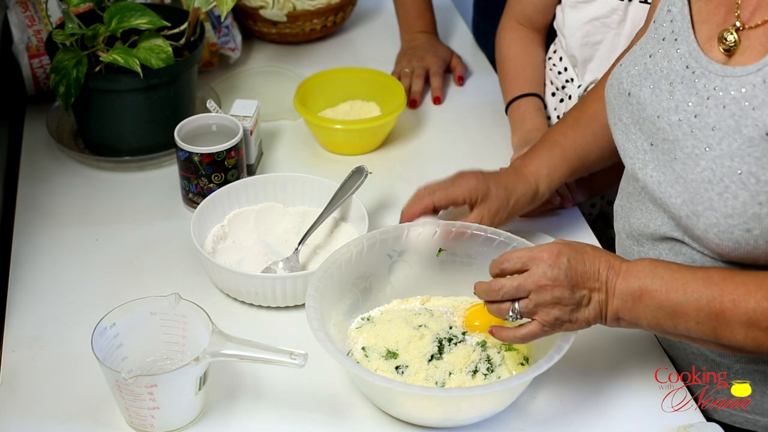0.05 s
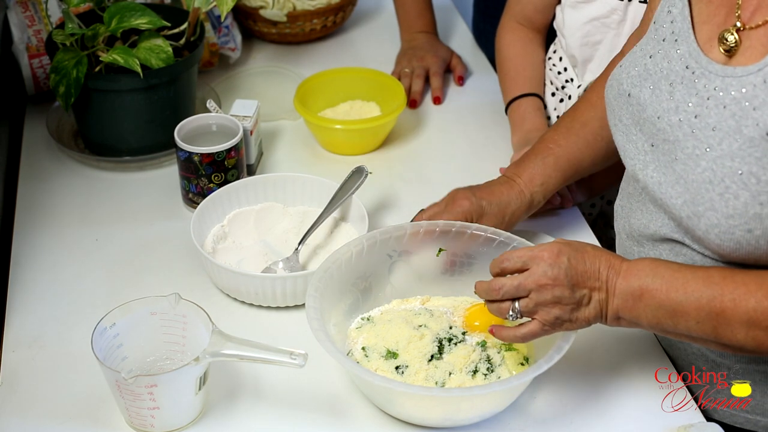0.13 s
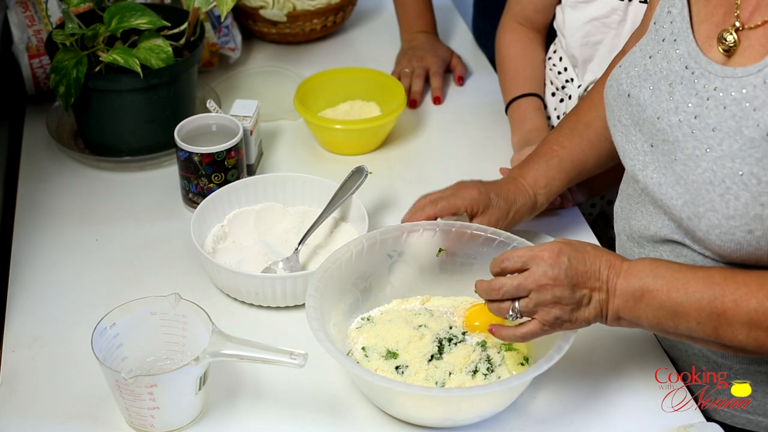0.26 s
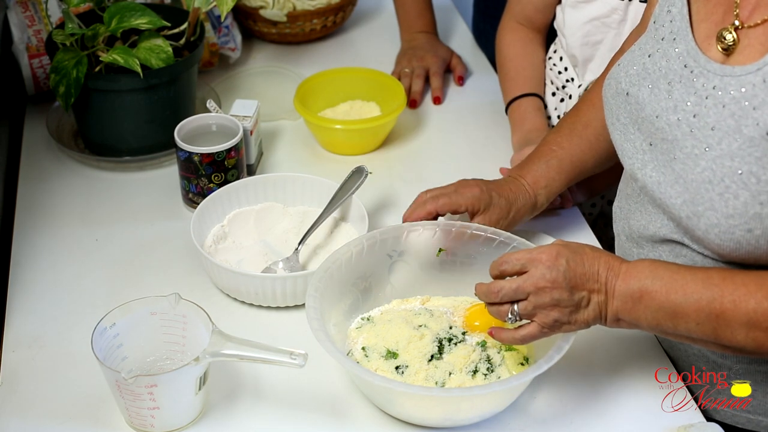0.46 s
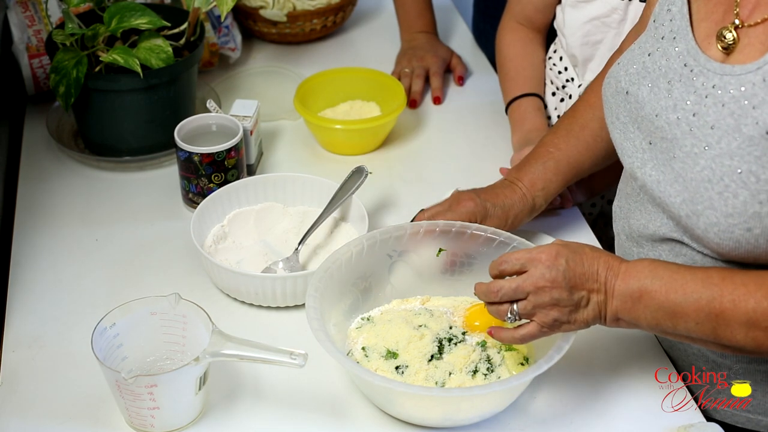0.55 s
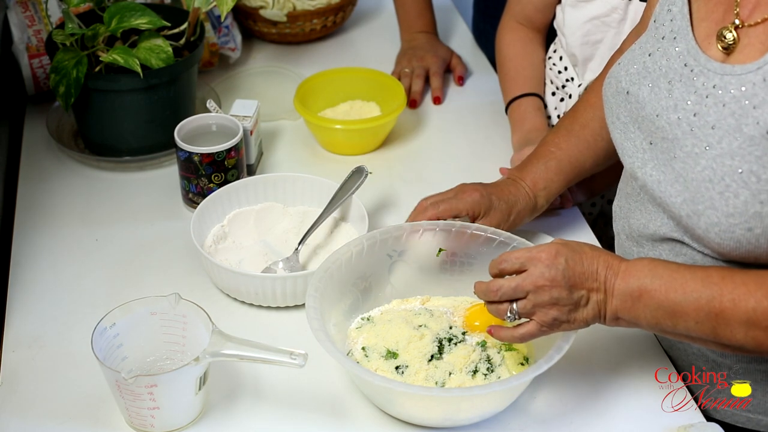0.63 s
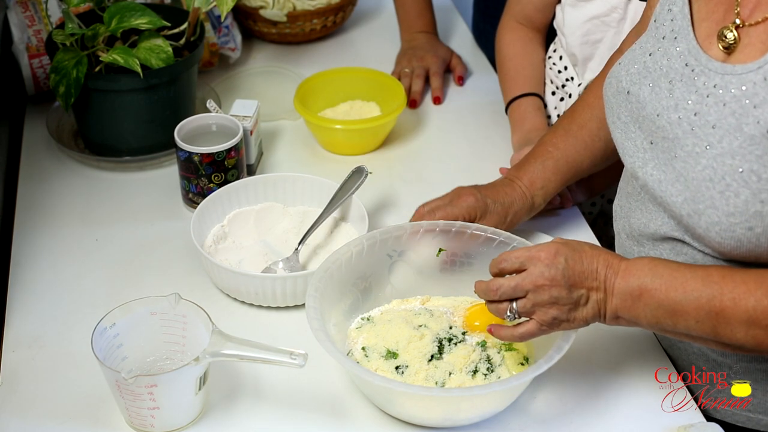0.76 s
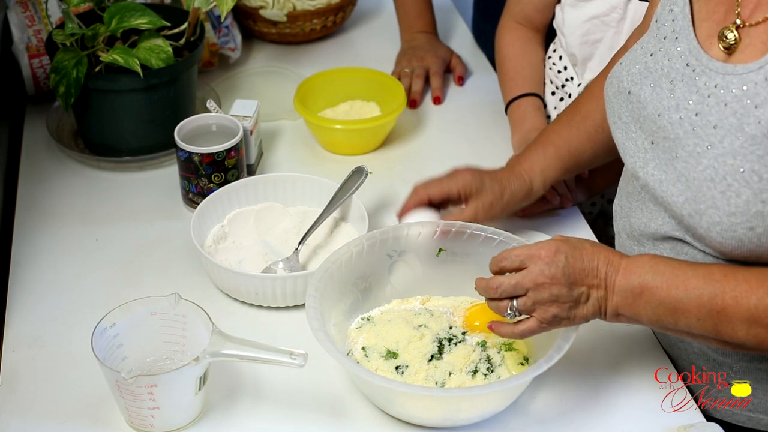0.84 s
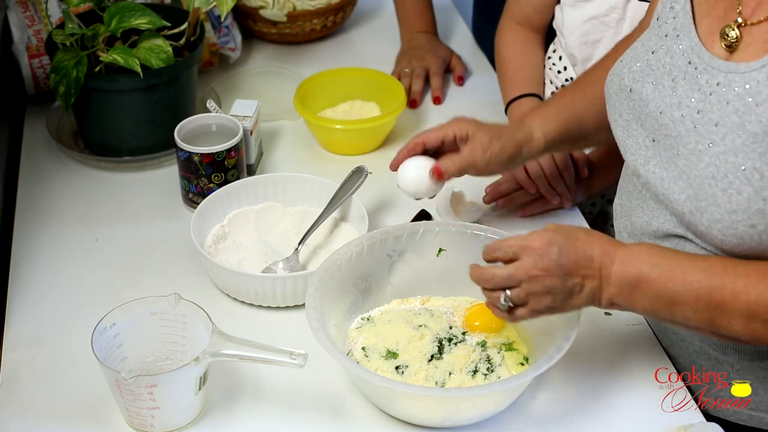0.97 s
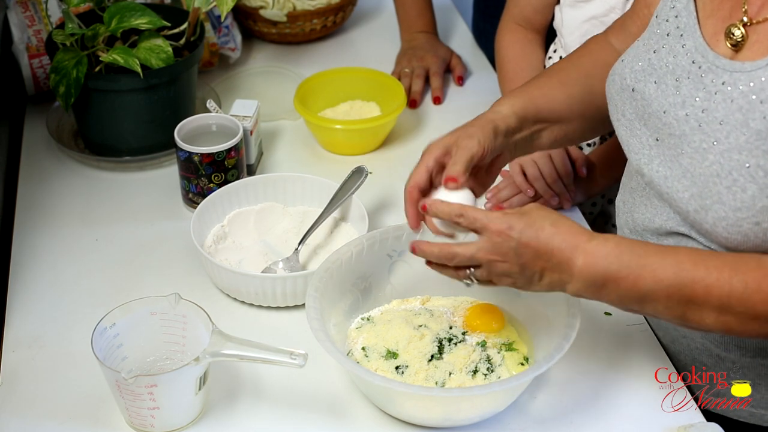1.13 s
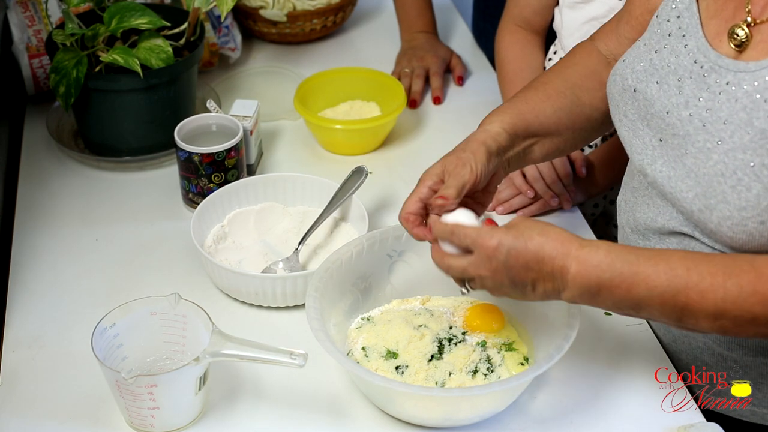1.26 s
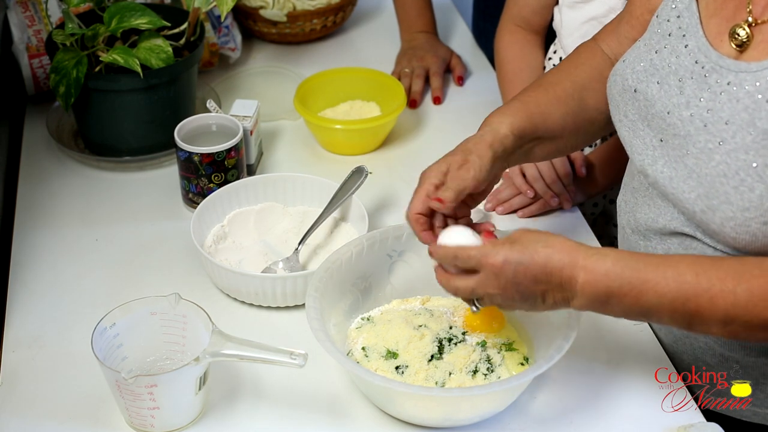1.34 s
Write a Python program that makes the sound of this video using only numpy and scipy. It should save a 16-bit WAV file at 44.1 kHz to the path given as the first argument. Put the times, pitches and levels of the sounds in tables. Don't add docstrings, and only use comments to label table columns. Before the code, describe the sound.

An egg is knocked four times on a hard edge, each softer, then its shell ticks

```python
import sys
import numpy as np
from scipy import signal
from scipy.io import wavfile

SR = 44100
rng = np.random.default_rng(int(sys.argv[2]) if len(sys.argv) > 2 else 0)


def volts_from_decibels(level):
    exponent = np.asarray(level, float) / 20
    return 10 ** exponent


def int16_out(signal):
    q = np.round(np.clip(np.atleast_2d(signal).T, -1, 1) * 32767)
    wavfile.write(sys.argv[1], SR, q.astype(np.int16))


N = 61739


def rms_one(x):
    return x / np.sqrt(np.mean(x ** 2) + 1e-20)


def at_hz(points, hz):
    table_hz, value = np.transpose(points)
    return np.interp(np.log(hz), np.log(table_hz), value)


def ring(x, hz, t60):
    r = volts_from_decibels(-60 / (t60 * SR))
    w = 2 * np.pi * hz / SR
    return signal.lfilter([0, np.sin(w)], [1, -2 * r * np.cos(w), r * r], x + 1e-18)


def bandpass(x, low_hz, high_hz):
    return signal.sosfilt(signal.butter(2, [low_hz, high_hz], "band", fs=SR, output="sos"), x)


def lowpass(x, hz, order=2):
    return signal.sosfilt(signal.butter(order, hz, fs=SR, output="sos"), x)


def bands(pair, low_hz):
    edges = low_hz * 2 ** np.arange(0, 12, 0.5)
    edges = edges[edges < 0.45 * SR]
    return [(np.sqrt(a * b), bandpass(pair[k % 2], a, b)) for k, (a, b) in enumerate(zip(edges, edges[1:]))]


def coloured(x, spectrum):
    lowest, highest = spectrum[0][0] / 1.2, spectrum[-1][0] * 1.5 / 1.2
    return sum(volts_from_decibels(at_hz(spectrum, hz)) * band
               for hz, band in bands([x, -x], 140) if lowest < hz < highest)


def click_at(s, gain):
    x = np.zeros(N)
    x[int(s * SR)] = gain
    return x


# frequency in Hz, level in dB per Hz
HUSH_COLOUR = [(20, 4.5), (117, -3.5), (265, 2.5), (500, -11.5), (1020, -16.5), (2500, -33.5),
               (6000, -35.5), (16500, -36.5)]
# frequency in Hz, width in Hz, level in dB
HUM_PARTIALS = [(178, 12, -86.5), (258, 14, -75), (315.3, 23, -67.5), (338.7, 12, -88), (463, 8, -69.5),
                (477.7, 10, -74), (790, 9.2, -96), (15400, 40, -99)]


def kitchen():
    white = rng.standard_normal((2, N + SR))
    hush = sum(volts_from_decibels(at_hz(HUSH_COLOUR, hz)) * band for hz, band in bands(white, 25))[SR:]
    out = volts_from_decibels(-59.5) * rms_one(hush)
    for hz, width_hz, db in HUM_PARTIALS:
        partial = ring(rng.standard_normal(N + SR), hz, 4.9 / width_hz)[SR:]
        out += volts_from_decibels(db) * rms_one(partial)
    return out


# start in seconds, level in dB, pitch in Hz, ring in cycles
SHELL_TICKS = [(0.027, -63.5, 3850, 19), (0.0278, -63.5, 1900, 6.5), (0.2075, -64, 8100, 20),
               (0.38, -62, 13300, 8), (0.798, -67, 2700, 12), (0.993, -55.5, 11240, 2.9),
               (1.025, -69.5, 13500, 8), (1.0358, -54.5, 8040, 8.3), (1.0346, -56.5, 11490, 6.5),
               (1.0355, -72.5, 5300, 8), (1.039, -51, 9430, 13.8), (1.045, -54, 8230, 18),
               (1.047, -67, 5700, 19), (1.086, -59, 11170, 2.9), (1.186, -60, 4600, 9.8),
               (1.1862, -61, 10400, 4), (1.232, -65, 8030, 11.3), (1.241, -54.5, 1700, 3.4),
               (1.2406, -56.5, 2920, 4.3), (1.2398, -56.5, 6360, 10.6), (1.2413, -55, 9600, 6.2),
               (1.257, -61, 2540, 4), (1.269, -80, 2600, 6.6), (1.260, -63, 9100, 2.9),
               (1.277, -64.5, 2540, 2.7), (1.3194, -57.5, 3140, 9.7), (1.3182, -58.5, 10400, 7),
               (1.3192, -57, 6800, 12), (1.327, -48, 7350, 4)]


def ticks():
    spread_s = 0.00012
    out, t = np.zeros(N + SR), np.arange(SR // 20) / SR
    for s, db, hz, cycles in SHELL_TICKS:
        rag = rng.standard_normal(len(t)) * np.exp(-t / spread_s)
        t60 = cycles / hz
        snap = ring(ring(rag, hz, t60), hz, t60)
        start = int(s * SR)
        out[start:start + len(t)] += volts_from_decibels(db + 3.5) * snap / np.abs(snap).max()
    return out[:N]


# frequency in Hz, t60 in seconds
ROOM_DECAY = [(200, .22), (500, .22), (1400, 0.21), (3000, .21), (7500, 0.17), (12000, 0.17), (16000, 0.11)]


def room(x):
    rise_s, late_db, late_stretch = 0.0048, -42.5, 7.6
    t = np.arange(SR // 2) / SR
    echo = np.zeros(len(t))
    for hz, noise in bands(rng.standard_normal((2, len(t))), 140):
        fall_db = -60 * t / at_hz(ROOM_DECAY, hz)
        echo += noise * (volts_from_decibels(fall_db) + volts_from_decibels(late_db + fall_db / late_stretch))
    echo *= 1 - np.exp(-(t / rise_s) ** 2)
    return signal.fftconvolve(x, echo / np.sqrt(np.sum(echo ** 2)))[:N]


# start in seconds, end in seconds, start pitch in Hz, end pitch in Hz,
# level in dB
RISING_SQUEAKS = [
    (0.098, 0.21, 11750, 13650, -83),
    (0.155, 0.21, 5600, 6500, -85),
]


def squeaks():
    bend, flicker_db, flicker_hz = 0.3, 3.0, 60
    rub_end_s, rub_hz, rub_width_hz, rub_db = 0.21, 2600, 200, -82
    out, t = np.zeros(N), np.arange(N) / SR
    for start, end, low_hz, high_hz, db in RISING_SQUEAKS:
        u = np.clip((t - start) / (end - start), 0, 1)
        hz = low_hz + (high_hz - low_hz) * (u + bend * u * (1 - u))
        flicker = rms_one(lowpass(rng.standard_normal(N), flicker_hz))
        level = volts_from_decibels(db + flicker_db * flicker) * np.clip(8 * u, 0, 1) * (t < end)
        out += level * np.sin(2 * np.pi * np.cumsum(hz) / SR)
    rub = rms_one(ring(rng.standard_normal(N), rub_hz, 2.2 / rub_width_hz))
    return out + volts_from_decibels(rub_db) * rub * (t < rub_end_s) * t / rub_end_s


def burst(s):
    fall_s, rise_s, snaps_per_s = 0.0013, 0.009, 14000
    t = np.arange(SR // 25) / SR
    chance, size, side = rng.random((3, len(t)))
    snaps = (chance < snaps_per_s / SR) * volts_from_decibels(-1.5 * np.log(size)) * np.sign(side - 0.5)
    snaps = snaps * (1 - np.exp(-(t / rise_s) ** 2)) * np.exp(-t / fall_s)
    x, start = np.zeros(N), int(s * SR)
    x[start:start + len(t)] = snaps / np.sqrt(np.sum(snaps ** 2))
    return x


# start in seconds, splinter level in dB, edge ring level in dB, egg body level in dB,
# top of the edge ring in Hz
EGG_KNOCKS = [
    (0.2100, -27.5, -25, -35.5, 3240),
    (0.4126, -42.5, -42, -45.5, 2080),
    (0.6285, -41.5, -44, -42, 2680),
    (0.8145, -53, -53.5, -53, 2340),
]
# frequency in Hz, level in dB per Hz
SPLINTER_COLOUR = [(3000, -0.5), (4200, 4), (6000, 2.5), (8400, 5.5), (12000, -4), (15500, -5.5)]
EDGE_COLOUR = [(700, -13.5), (1000, -2), (1400, 6.5), (2000, -1.5), (2900, 2), (4000, -9)]
BODY_COLOUR = [(170, -29), (240, -5.5), (340, -3.5), (480, 3.5), (680, 2.5), (960, -0.5), (1400, -25.5),
               (2000, -47.5)]
# pitch in Hz, level in dB, t60 in seconds
SHELL_RINGS = [(3000, -43.5, 0.002), (3330, -39, 0.007), (1245, -44.5, 0.0083), (460, -50, 0.045)]
CONTENTS_RINGS = [(720, -37, 0.0071), (489, -41.5, 0.03), (637, -39.5, 0.0033), (696, -48, 0.0044)]
RIM_RINGS = [(1400, -42, .03), (1900, -45, 0.0085), (2310, -49.5, 0.023), (1700, -59, 0.013)]


def knocks():
    direct_db, room_db, edge_swell_s = -3, 0.5, 0.0046
    dip_hz, dip_q, dip_share = 3950, 5.3, 0.41
    out, t = np.zeros(N), np.arange(N) / SR
    for knock, *notes in zip(EGG_KNOCKS, SHELL_RINGS, CONTENTS_RINGS, RIM_RINGS):
        s, splinter_db, edge_db, body_db, top_hz = knock
        hit = volts_from_decibels(direct_db) * burst(s) + volts_from_decibels(room_db) * room(click_at(s, 0.95))
        swollen = hit * (1 - np.exp(-np.maximum(t - s, 0) / edge_swell_s))
        edge = lowpass(coloured(swollen, EDGE_COLOUR), top_hz, order=6)
        out += volts_from_decibels(splinter_db + 29.5) * coloured(hit, SPLINTER_COLOUR)
        out += volts_from_decibels(edge_db + 38.5) * edge
        out += volts_from_decibels(body_db + 41.5) * coloured(hit, BODY_COLOUR)
        for hz, db, t60 in notes:
            out += volts_from_decibels(db + 10) * ring(hit, hz, t60)
    peak = signal.lfilter(*signal.iirpeak(dip_hz, dip_q, fs=SR), out)
    return out - dip_share * peak


# start in seconds, level in dB, pitch in Hz, t60 in seconds
LEG_SWAYS = [
    (0.2105, -17.5, 31.5, 0.17),
    (0.415, -59, 40, 0.11),
    (1.013, -43.5, 23.39, 0.44),
]


def sways():
    rocking = sum(ring(click_at(s, volts_from_decibels(db)), hz, t60) for s, db, hz, t60 in LEG_SWAYS)
    return lowpass(rocking, 140)


# thud start in seconds, thud level in dB, thud pitch in Hz,
# table boom start in seconds, boom level in dB
EGG_LANDINGS = [
    (0.2108, -19.5, 404, 0.2205, -28),
    (0.4188, -25.5, 450, 0.4235, -32.5),
    (0.6323, -20, 556, 0.6392, -37),
    (0.8198, -41.5, 453, 0.8258, -40.5),
]
# pitch in Hz, level in dB, t60 in seconds
TABLE_MODES = [(78.6, -4, 0.18), (105, -2, 0.036), (124, 6.5, .17), (231.7, -0.5, 0.14)]


def landings():
    thud_cycles = 2.9
    out = np.zeros(N)
    for s, thud_db, thud_hz, boom_s, boom_db in EGG_LANDINGS:
        out -= ring(click_at(s, volts_from_decibels(thud_db)), thud_hz, thud_cycles / thud_hz)
        push = bandpass(click_at(boom_s, volts_from_decibels(boom_db)), 55, 245)
        for hz, db, t60 in TABLE_MODES:
            out += volts_from_decibels(db) * ring(push, hz, t60)
    return out


def scene():
    small = ticks()
    shell = small + volts_from_decibels(-10) * room(small)
    mix = kitchen() + shell + squeaks() + knocks() + sways() + landings()
    return mix[None]


def top_cut(x):
    return signal.sosfilt(signal.butter(12, 16820, fs=SR, output="sos"), x)


def record(dry):
    cut = signal.sosfilt(signal.cheby2(10, 50, 16700, fs=SR, output="sos"), dry)
    return top_cut(cut)


dry = scene()
out = record(dry)
int16_out(out)
```